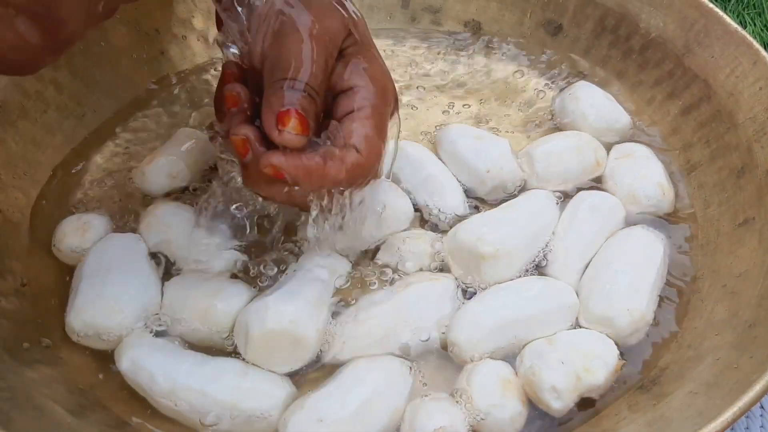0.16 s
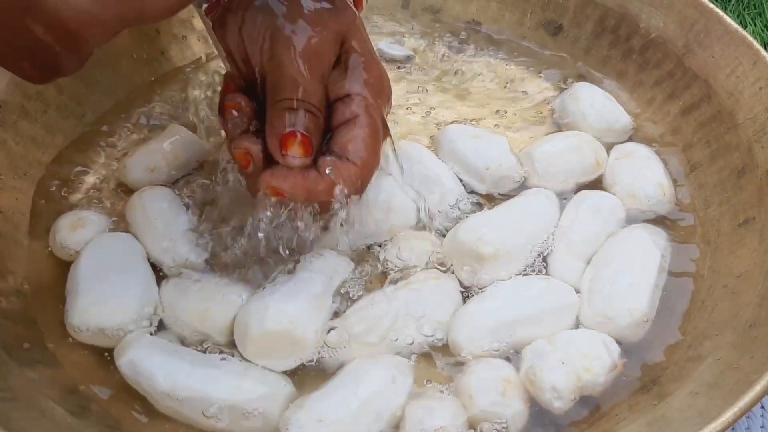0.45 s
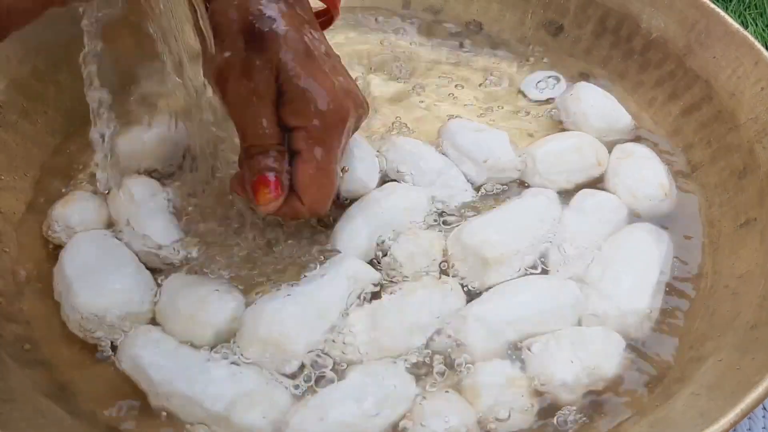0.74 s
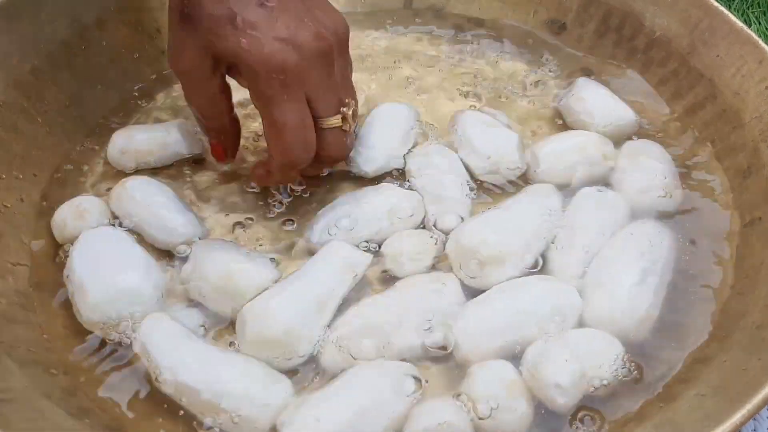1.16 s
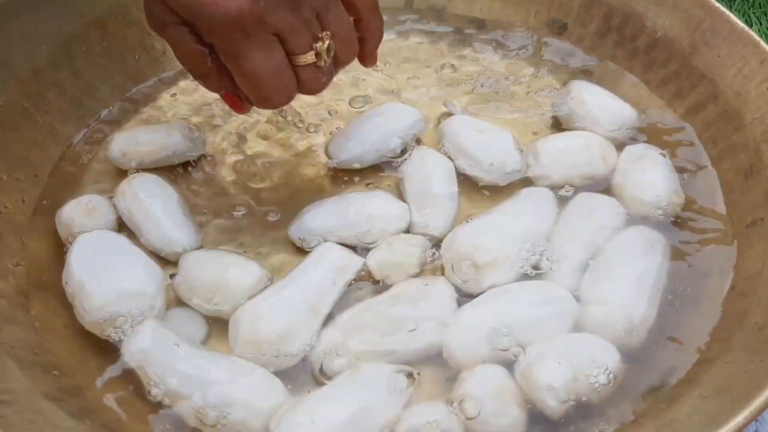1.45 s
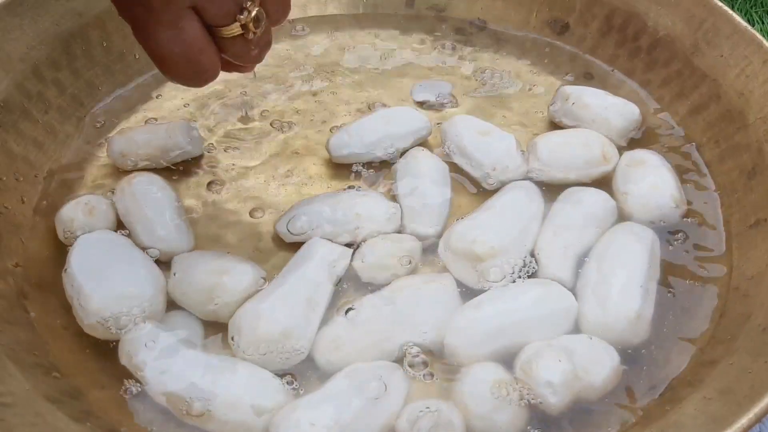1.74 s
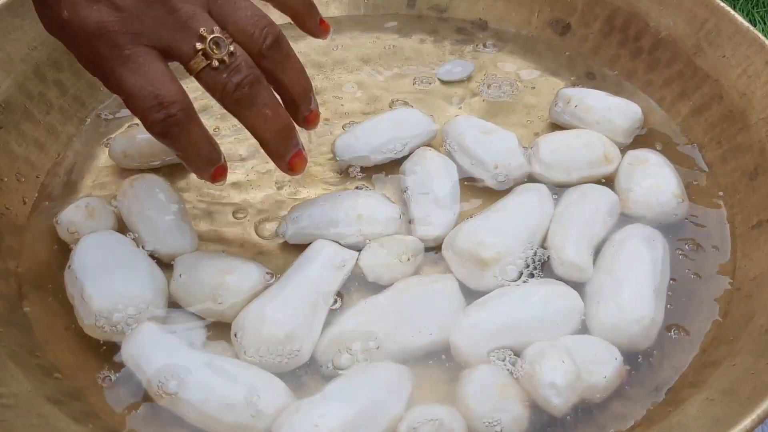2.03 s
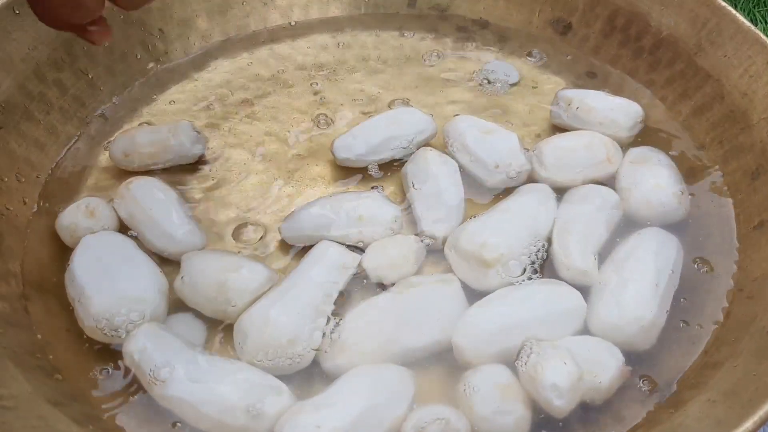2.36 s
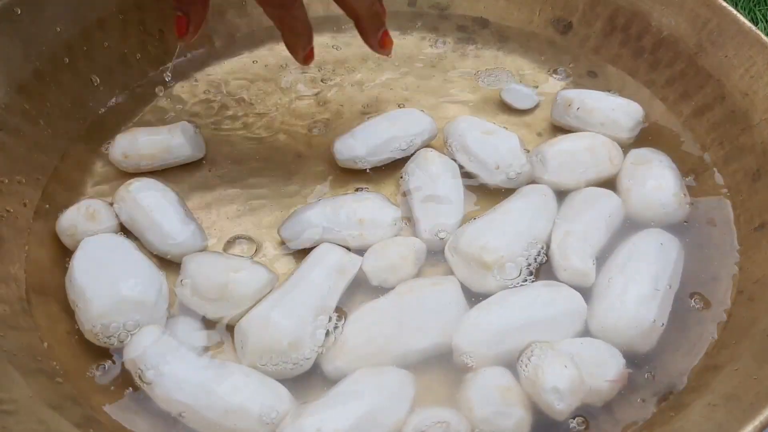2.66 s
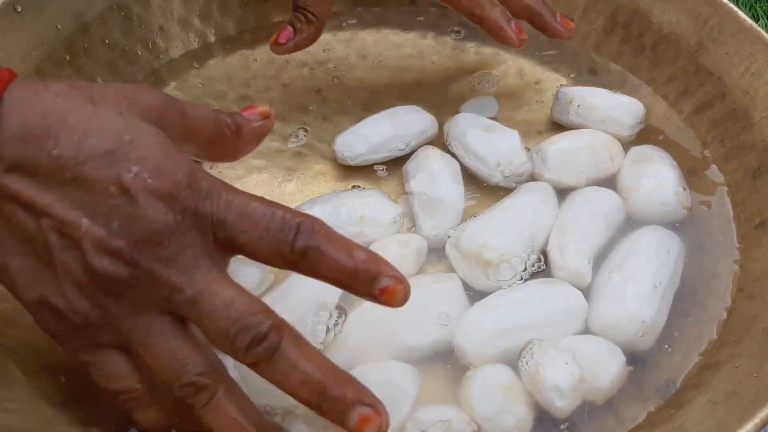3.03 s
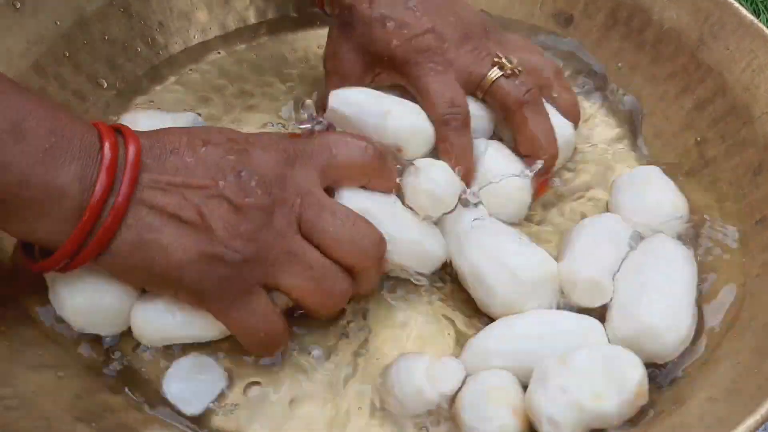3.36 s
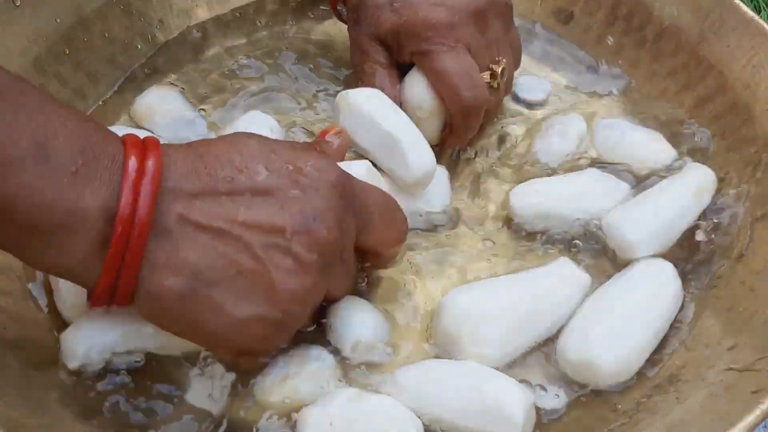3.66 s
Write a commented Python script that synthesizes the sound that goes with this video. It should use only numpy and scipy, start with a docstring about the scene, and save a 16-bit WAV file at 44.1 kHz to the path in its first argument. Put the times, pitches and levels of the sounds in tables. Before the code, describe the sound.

Water pouring and spattering into a basin of peeled roots, later a bangle knock and stirring

```python
"""Outdoors: low rumble and insects throughout, one shrill steady, two lower ones swelling and fading.
From 0 s water runs from a cupped hand into a metal basin of peeled roots (clouds of damped, rising sines
plus noise), dying away in spatters and drips by 1.6 s. Far birds from 1.4 s (echoed glides); from 1.8 s
bangles clink (modal rings) and wet fingers rustle (noise); one bangle knocks the basin at 3.0 s.
From 3.2 s hands stir: bumps, gurgles, plops and a sharp splash at 3.54 s."""
import sys
import numpy as np
from scipy import signal
from scipy.fft import rfft, irfft, next_fast_len
from scipy.io import wavfile
from scipy.ndimage import map_coordinates

SR = 44100
rng = np.random.default_rng(int(sys.argv[2]) if len(sys.argv) > 2 else 0)


def file_out(sig):
    """Save sig as 16-bit WAV at sys.argv[1]."""
    # one column per channel
    cols = np.atleast_2d(sig).T
    # limit, then scale
    lim = np.clip(cols, -1, 1)
    pcm = np.round(lim * 32767).astype(np.int16)
    wavfile.write(sys.argv[1], SR, pcm)


N = 167580


def amp(db):
    """Amplitude factor of a level in dB."""
    return 10 ** (np.asarray(db) / 20)


def unit(x):
    """x scaled to rms 1."""
    return x / np.sqrt(np.mean(x ** 2) + 1e-20)


def along(points, hz):
    """Interpolate (frequency [Hz], value) points on a log frequency axis."""
    point_hz, values = np.transpose(points)
    return np.interp(np.log(hz + 1), np.log(point_hz + 1), values)


def gains(rows):
    """One gain curve per dB column; end levels hold 0.1 s past the rows, then silence."""
    times_s, *columns_db = np.transpose(rows)
    t = np.arange(N) / SR
    active = (t > times_s[0] - .1) * (t < times_s[-1] + .1)
    return [amp(np.interp(t, times_s, db)) * active for db in columns_db]


def wobble(knots_per_s):
    """Smooth random curve through normally distributed knots."""
    knots = rng.standard_normal(int(N * knots_per_s / SR) + 4)
    return map_coordinates(knots, [np.arange(N) * knots_per_s / SR])


def filtered(x, response):
    """Multiply the spectrum of x by response(hz)."""
    n = x.shape[-1]
    m = next_fast_len(n + 4096)
    return irfft(rfft(x, m) * response(np.fft.rfftfreq(m, 1 / SR)), m)[..., :n]


def coloured(x, spectrum):
    """x filtered by (frequency [Hz], gain [dB]) points, at rms 1."""
    return unit(filtered(x, lambda hz: amp(along(spectrum, hz))))


# left-right correlation: (frequency [Hz], correlation [0-1])
STEREO_CORRELATION = [(50, 0.96), (200, 0.95), (800, 0.034), (3000, 0.059), (12000, 0)]


def rush(spectrum):
    """Stereo noise; mid and side shares set the correlation, near mono in the bass."""
    def mid_side_gains(hz):
        angle = np.arccos(np.clip(along(STEREO_CORRELATION, hz), -1, 1)) / 2
        return np.array([np.cos(angle), np.sin(angle)])
    mid, side = filtered(rng.standard_normal((2, N)), mid_side_gains)
    return coloured(np.array([mid + side, mid - side]), spectrum)


def fuzzy_tone(hz, half_width_hz):
    """Narrow band of stereo noise: slow noise modulates a carrier's two quadratures."""
    noise = rng.standard_normal((2, 2, len(hz)))
    a, b = filtered(noise, lambda f: 1 / (1 + (f / half_width_hz) ** 4) ** .5)
    phase = 2 * np.pi * np.cumsum(hz) / SR
    return unit(a * np.cos(phase) + b * np.sin(phase))


def add(out, start_s, x):
    """Mix x into out from start_s."""
    part = out[:, max(round(start_s * SR), 0):][:, :x.shape[-1]]
    part += x[..., :part.shape[1]]


def bubble(t, hz, life_cycles, rise=0.036):
    """Ringing bubble: damped sine, soft start, slightly rising pitch; falls 60 dB in life_cycles."""
    cycles = np.maximum(t, 0) * hz
    tone = np.sin(2 * np.pi * cycles * (1 + rise * cycles / life_cycles))
    return tone * amp(-60 * cycles / life_cycles) * (1 - np.exp(-cycles / 0.59))


# water between the channels: mean left lead, its spread, level difference spread
LEAD_S, LAG_SPREAD_S, PAN_SPREAD_DB = .00007, .00007, 2.5


def grains(t0_s, t1_s, count, hz, spread, life_cycles, size_db, samples=500):
    """Stereo shower of bubbles of random time, pitch, strength and place, at rms 1."""
    u, g = rng.random((count, 2)), rng.standard_normal((count, 3))
    pitch_hz = np.clip(hz * np.exp(spread * g[:, :1]), 150, SR / 3)
    strength = amp(size_db * np.minimum(-np.log(1 - u[:, 1:]), 3.5))
    starts = (SR * np.abs(t0_s + (t1_s - t0_s) * u[:, :1])).astype(int)
    where = starts + np.arange(samples)
    channels = []
    for side in (.5, -.5):
        t = np.arange(samples) / SR + side * (LEAD_S + LAG_SPREAD_S * g[:, 1:2]) - .0002
        pan = amp(side * PAN_SPREAD_DB * g[:, 2:])
        waves = strength * pan * bubble(t, pitch_hz, life_cycles)
        channels.append(np.bincount(where.ravel(), waves.ravel(), N)[:N])
    return unit(np.array(channels))


def shower(x, spectrum, active_s):
    """Coloured grains, at rms 1 over their active time."""
    return coloured(x, spectrum) * np.sqrt(active_s * SR / N)


def ring(modes, t):
    """Sum of decaying modes, random level and phase per mode and channel."""
    draws = rng.standard_normal((len(modes), 2, 2, 1))
    out = 0
    for (hz, db, t60_s), (level_db, phase) in zip(modes, draws):
        out = out + amp(db + level_db - 60 * t / t60_s) * np.sin(2 * np.pi * hz * t + phase)
    return out


RING_RISE_S = 0.0024


def ring_rise(t):
    """Soft exponential onset of a ring."""
    return 1 - np.exp(-t / RING_RISE_S)


def burst(t, colour, t60_s):
    """Decaying puff of coloured stereo noise."""
    return coloured(rng.standard_normal((2, len(t))), colour) * amp(-60 * t / t60_s)


# rumble and hiss: (frequency [Hz], relative gain [dB])
AIR_SPECTRUM = [(22, -37.5), (45, 1.5), (80, 1), (120, -7.5), (180, -3.5), (280, -21), (520, -38),
                (1500, -32.5), (2600, -38), (3300, -26.5), (6000, -31), (8300, -39), (13500, -36),
                (16000, -40.5)]
AIR_DB, AIR_WOBBLE_DB = -51.5, 1


def air():
    """Low outdoor rumble with faint hiss: noise of slightly wandering level."""
    return amp(AIR_DB + AIR_WOBBLE_DB * wobble(7.15)) * rush(AIR_SPECTRUM)


# lower insects: (frequency [Hz], half width [Hz], base level [dB])
INSECT_TONES = [(3803, 36.5, -60), (3410, 8.1, -70)]
# swell of the lower insects: (time [s], level change [dB])
INSECT_SWELL_DB = [(0, 4), (1.7, 2), (1.9, -4), (2.8, -1), (3.3, -3)]
SHRILL_HZ, SHRILL_HALF_WIDTH_HZ, SHRILL_DB = 10240, 500, -60.5


def insects():
    """Narrow noise bands: one steady shrill, two lower ones swelling and fading."""
    out = amp(SHRILL_DB) * fuzzy_tone(np.full(N, SHRILL_HZ), SHRILL_HALF_WIDTH_HZ)
    swell_db = np.interp(np.arange(N) / SR, *np.transpose(INSECT_SWELL_DB))
    for hz, half_width_hz, db in INSECT_TONES:
        out += amp(db + swell_db + wobble(7.3)) * fuzzy_tone(np.full(N, hz), half_width_hz)
    return out


# falling water: (time [s], bubble base level [dB], spray base level [dB])
POUR_LEVELS = [(0, -36.5, -39), (.12, -38.5, -42), (.22, -35, -40), (.29, -37, -46), (.37, -34, -37),
               (.42, -37.5, -42.5), (.64, -34.5, -38), (.76, -35.5, -44.5), (.8, -42.5, -46.5),
               (.87, -40, -45), (.95, -63.5, -54), (1.12, -90.5, -64), (1.6, -100, -77)]
# spectra: (frequency [Hz], relative gain [dB]); spray also colours the stirring fizz
BUBBLE_SPECTRUM = [(300, -32.5), (480, -20), (700, -11.5), (1000, -7.5), (1450, -4), (2200, 1.5),
                   (2900, -3.5), (5000, -11), (8000, -55)]
SPRAY_SPECTRUM = [(1500, -22), (3200, 1.5), (4500, 0.5), (7500, -3.5), (11000, 2), (14500, 5.5), (16000, 1)]
RUMBLE_SPECTRUM = [(35, -36), (72, -1.5), (110, -10.5), (170, -12), (300, -26)]
POUR_RUMBLE_DB = -10.5  # re bubble base level


def pour():
    """Stream drives bubbles under the surface, drums on the basin, throws up fine flickering spray."""
    body, spray = gains(POUR_LEVELS)
    cloud = grains(0, 1.2, count=2300, hz=1808, spread=0.552, life_cycles=22.6, size_db=4, samples=900)
    mist = grains(0, 1.7, count=3200, hz=7040, spread=0.53, life_cycles=11.7, size_db=6.0, samples=200)
    bubbles = shower(cloud, BUBBLE_SPECTRUM, 1.06)
    drops = shower(mist, SPRAY_SPECTRUM, 1.57)
    under = amp(-2.5) * bubbles + amp(-8.5) * rush(BUBBLE_SPECTRUM)
    under = under + amp(POUR_RUMBLE_DB) * rush(RUMBLE_SPECTRUM)
    flicker = amp(0.45 * wobble(51.0))
    return body * under + spray * flicker * (drops + amp(-5.0) * rush(SPRAY_SPECTRUM))


# sharp spatters: (time [s], level [dB])
SPATTER_EVENTS = [(.108, -27.5), (.178, -22), (.198, -21.5), (.336, -20.5), (0.3709, -13), (0.3755, -16),
                  (0.749, -24), (0.771, -28), (0.7832, -20), (.803, -31), (.846, -24.5), (0.9622, -34.5),
                  (.992, -43), (1.126, -42), (1.553, -49), (3.4905, -37), (3.5399, -20.5), (3.543, -10),
                  (3.5487, -24), (3.611, -32.5), (3.661, -31.5), (3.68, -31.5)]
# (frequency [Hz], relative gain [dB]); also colours bangle ticks and finger rustle
SPATTER_SPECTRUM = [(300, -19), (1500, -6.5), (5000, -2), (8000, -2), (12000, 1), (16000, -10.5)]
SPATTER_T60_S = 0.0065


def spatters():
    """Sharp water spatters: very short noise bursts."""
    out, t = np.zeros((2, N)), np.arange(SR // 10) / SR
    for start_s, db in SPATTER_EVENTS:
        add(out, start_s, amp(db) * burst(t, SPATTER_SPECTRUM, SPATTER_T60_S))
    return out


# single large bubbles: (time [s], initial pitch [Hz], level [dB], 60 dB life [cycles])
PLOP_EVENTS = [(.110, 730, -28, 14.5), (.130, 3230, -22, 33), (.153, 1570, -16, 11),
               (0.1601, 2380, -10, 21), (0.168, 1406, -23, 53), (.231, 860, -27.5, 20),
               (.368, 1170, -22, 12), (.4815, 2125, -19, 46), (.568, 1950, -18, 22), (.652, 2040, -22, 24),
               (0.721, 1595, -23.5, 24), (0.815, 2330, -28, 47), (0.991, 4126, -30, 50),
               (3.37, 292, -26.5, 7.2), (3.373, 1960, -31, 8.8), (3.4903, 410, -26, 13.5),
               (3.49, 1700, -18, 5.3), (3.536, 2540, -12.5, 13.5), (3.54, 200, -30.5, 12.6),
               (3.5423, 2060, -2.5, 11), (3.5424, 1016, -12, 7.5), (3.545, 1580, -10.5, 11),
               (3.554, 2030, -29, 18), (3.619, 558, -22.5, 28.6), (3.634, 449, -30.5, 35),
               (3.68, 2020, -30.5, 26)]


def plops():
    """Large single bubbles standing out of the water noise, left channel leading."""
    out, t = np.zeros((2, N)), np.arange(SR // 10) / SR
    for start_s, hz, db, life_cycles in PLOP_EVENTS:
        add(out, start_s, amp(db) * bubble(t + np.array([[0], [-LEAD_S]]), hz, life_cycles))
    return out


WALL_DB, WALL_T60_S, WALL_LOW_HZ = -1, 0.035, 800


def walls(water):
    """Basin sides scatter the water's sound, a new tail every 50 ms; longer waves pass round them."""
    t, out = np.arange(SR // 10) / SR, np.zeros((2, N))
    block = SR // 20
    for start in range(0, N, block):
        tail = rng.standard_normal((2, len(t))) * amp(-60 * t / WALL_T60_S) * (t > .0007)
        tail = unit(tail) / np.sqrt(len(t))
        add(out, start / SR, signal.fftconvolve(water[:, start:start + block], tail, axes=1))
    return amp(WALL_DB) * filtered(out, lambda hz: hz / np.hypot(hz, WALL_LOW_HZ))


# far birds: (time [s], length [s], start pitch [Hz], end pitch [Hz], base level [dB])
BIRD_CALLS = [(1.422, 0.4, 892, 903, -68.5), (1.659, .2, 1410, 2453, -60), (1.74, .12, 1042, 1185, -65),
              (1.76, 0.17, 2078, 1939, -56.5), (1.968, .11, 4900, 3300, -56.5),
              (2.28, .14, 1586, 1400, -69.5), (2.412, 0.14, 4575, 3090, -58.5),
              (2.44, .26, 1880, 2122, -60), (2.719, 0.12, 4270, 3170, -57.5), (2.738, .18, 2096, 1448, -63)]
BIRD_WAVER_SHARE, BIRD_ECHO_T60_S = .04, .65


def birds():
    """Far hoarse glides of trembling pitch, heard only as their echo among the trees."""
    out, t = np.zeros((2, N)), np.arange(SR // 2) / SR
    for start_s, length_s, start_hz, end_hz, db in BIRD_CALLS:
        u = np.linspace(0, 1, int(length_s * SR))
        waver = 1 + BIRD_WAVER_SHARE * wobble(121.3)[:len(u)]
        hz = (start_hz + (end_hz - start_hz) * u) * waver
        call = np.sqrt(np.abs(np.sin(np.pi * u))) * np.sin(2 * np.pi * np.cumsum(hz) / SR)
        echo = unit(rng.standard_normal((2, len(t))) * amp(-60 * t / BIRD_ECHO_T60_S)) / np.sqrt(len(t))
        add(out, start_s, amp(db + 6) * signal.fftconvolve(call[None], echo, axes=1))
    return out


# rings of a bangle: (nominal frequency [Hz], base level [dB], t60 [s])
BANGLE_MODES = [(4590, -8.5, 0.089), (8910, 1, 0.082), (13680, 2.5, 0.078), (14600, -4.5, 0.091)]
BANGLE_SPREAD_SHARE, CLINK_TICK_DB, CLINK_TICK_T60_S = 0.0145, -5.5, 0.08


def jingle(t, count=5):
    """Bangles of nearly the same pitch ring together under a noisy tick."""
    modes = []
    for hz, db, t60_s in BANGLE_MODES:
        for g in rng.standard_normal(count):
            modes.append((hz * (1 + BANGLE_SPREAD_SHARE * g), db, t60_s))
    tick = amp(CLINK_TICK_DB) * burst(t, SPATTER_SPECTRUM, CLINK_TICK_T60_S)
    return (ring(modes, t) / np.sqrt(count) + tick) * ring_rise(t)


# bangle clinks: (time [s], base level [dB])
CLINK_EVENTS = [(1.778, -39), (1.791, -32), (1.865, -44), (2.297, -35.5), (2.348, -40), (2.969, -14.5),
                (2.996, -29.5), (3.087, -29), (3.105, -34.5), (3.328, -27.5), (3.41, -20.5), (3.423, -31.5),
                (3.716, -25.5)]


def clinks():
    """Bangles clink together, each clink a freshly drawn jingle."""
    out, t = np.zeros((2, N)), np.arange(SR // 5) / SR
    for start_s, db in CLINK_EVENTS:
        add(out, start_s, amp(db - 9.5) * jingle(t))
    return out


RUSTLE_S, RUSTLE_LENGTH_S, RUSTLE_DB = 1.78, 0.19, -50.5


def rustle():
    """Wet fingers rustle: soft broad hiss under a smooth swell."""
    out = np.zeros((2, N))
    swell = np.hanning(int(RUSTLE_LENGTH_S * SR))
    add(out, RUSTLE_S, amp(RUSTLE_DB) * swell * rush(SPATTER_SPECTRUM)[:, :len(swell)])
    return out


# basin ring, damped by water: (frequency [Hz], relative level [dB], t60 [s])
BASIN_MODES = [(760, -31, 0.24), (902, -28.5, 0.25), (1273, -23, 0.22), (1986, -10.5, 0.14),
               (2023, -10, 0.13), (4530, -29, 0.061), (6200, -6, 0.033)]
# knock noise: (frequency [Hz], relative gain [dB])
KNOCK_SPECTRUM = [(500, -53), (1900, 12), (2900, 0), (4500, 4.5), (6500, 0.5), (8000, -10), (10000, 7.5),
                  (16000, -14)]
KNOCK_S, KNOCK_RING_DB = 2.9698, -24
CRACK_DB, CRACK_T60_S, WASH_DB, WASH_T60_S = -20.5, 0.04, -38.5, 0.22


def knock():
    """A bangle knocks the basin: modal ring, short crack, longer noise wash."""
    out, t = np.zeros((2, N)), np.arange(SR // 5) / SR
    tone = amp(KNOCK_RING_DB) * ring(BASIN_MODES, t) * ring_rise(t)
    crack = amp(CRACK_DB) * burst(t, KNOCK_SPECTRUM, CRACK_T60_S)
    wash = amp(WASH_DB) * burst(t, KNOCK_SPECTRUM, WASH_T60_S)
    add(out, KNOCK_S, tone + crack + wash)
    return out


# roots bumping on the bottom: (time [s], base level [dB])
BUMP_LEVELS = [(3.22, -71), (3.27, -56.5), (3.37, -49), (3.66, -52), (3.78, -65)]
# low modes of the bottom: (frequency [Hz], relative level [dB], t60 [s])
BOTTOM_MODES = [(291.4, 0, 0.094), (421, -6.5, 0.067), (597, -2.5, 0.075)]


def bumps(count=16):
    """Roots jostle on the bottom at uneven moments; each bump rings its low modes, in mono."""
    out, t = np.zeros((2, N)), np.arange(SR // 10) / SR
    times_s, levels_db = np.transpose(BUMP_LEVELS)
    slots = (np.arange(count) + rng.random(count)) / count
    for start_s in times_s[0] + (times_s[-1] - times_s[0]) * slots:
        level = amp(np.interp(start_s, times_s, levels_db) + 8)
        add(out, start_s, level * ring(BOTTOM_MODES, t)[:1] * ring_rise(t))
    return out


# stirring hands: (time [s], slosh base level [dB], fizz base level [dB])
STIR_LEVELS = [(3.29, -67, -80), (3.34, -46.5, -51.5), (3.46, -49, -52.5), (3.55, -39.5, -47.5),
               (3.64, -42.5, -47.5), (3.71, -47.5, -52), (3.8, -61, -58)]
# spectra: (frequency [Hz], relative gain [dB])
SLOSH_SPECTRUM = [(30, -14), (50, 3), (110, -6), (180, 1.5), (300, -5), (560, -2), (900, -6), (1150, -15),
                  (1900, 9), (3000, -3), (5000, -30)]
SWISH_SPECTRUM = [(400, -17), (2000, 4.5), (5000, -12), (15000, -19)]
SWISH_DB = -8  # re fizz


def stir():
    """Hands push the roots about: bubble gurgles, fizz, and a swish of water round the fingers."""
    slosh, fizz = gains(STIR_LEVELS)
    large = grains(3.2, 3.8, count=300, hz=1000, spread=0.852, life_cycles=19, size_db=3, samples=1800)
    fine = grains(3.2, 3.8, count=300, hz=6530, spread=0.6, life_cycles=9, size_db=5.5, samples=140)
    gurgle = shower(large, SLOSH_SPECTRUM, 0.49)
    drops = shower(fine, SPRAY_SPECTRUM, 0.43)
    body = amp(-2.0) * gurgle + amp(-12.5) * rush(SLOSH_SPECTRUM)
    return slosh * body + fizz * (drops + amp(SWISH_DB) * rush(SWISH_SPECTRUM))


def scene():
    """Sum all sources; the basin walls echo only the water and root bumps."""
    water = pour() + spatters() + plops() + bumps() + stir()
    hands = clinks() + rustle() + knock()
    return air() + insects() + water + walls(water) + birds() + hands


TOP_HZ = 15600


def record(dry):
    """Steep low-pass at TOP_HZ."""
    return filtered(dry, lambda hz: 1 / (1 + (hz / TOP_HZ) ** 80))


dry = scene()
out = record(dry)
file_out(out)
```